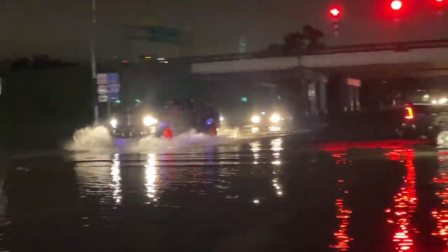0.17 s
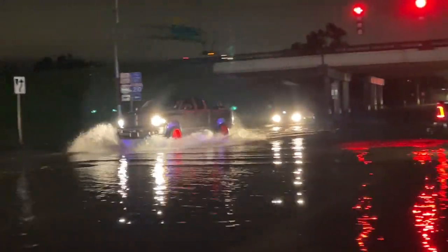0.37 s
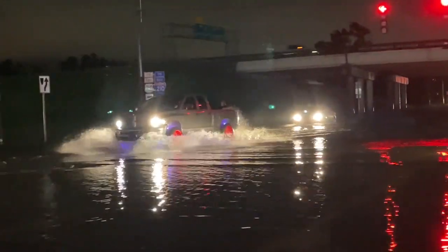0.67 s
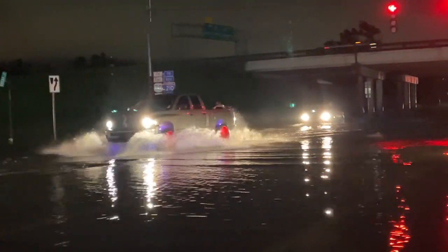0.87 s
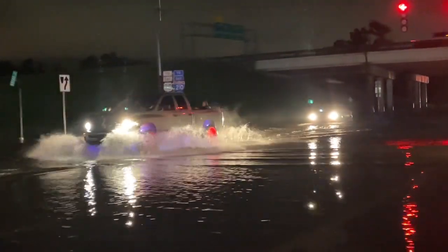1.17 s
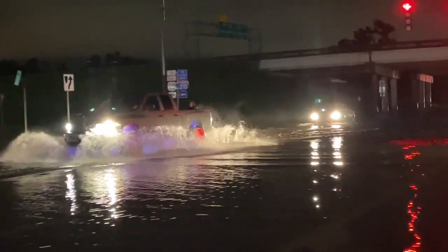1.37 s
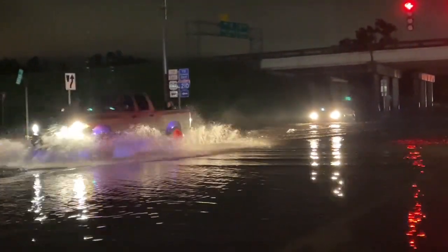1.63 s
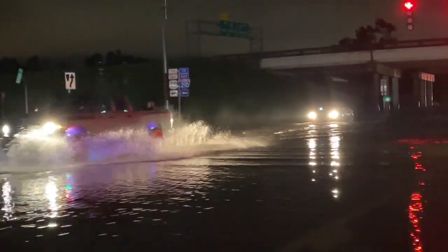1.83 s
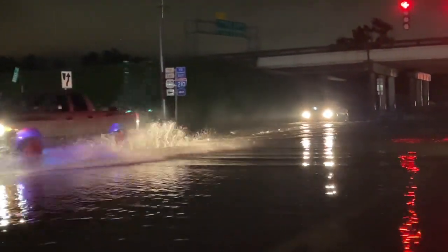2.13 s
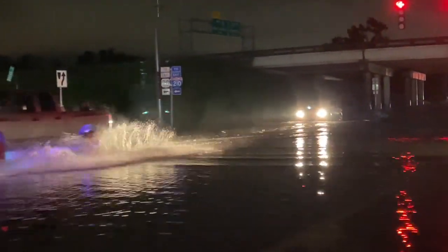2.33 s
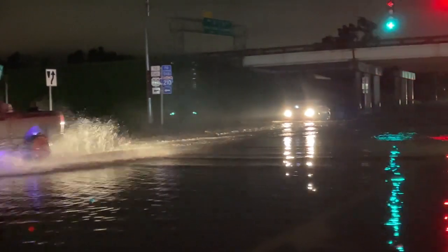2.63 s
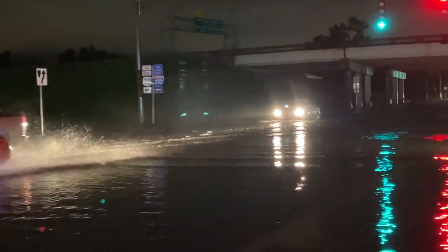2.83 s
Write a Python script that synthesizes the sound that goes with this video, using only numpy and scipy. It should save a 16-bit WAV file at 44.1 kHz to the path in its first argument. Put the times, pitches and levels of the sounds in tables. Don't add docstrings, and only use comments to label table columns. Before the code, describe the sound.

Heavy wet rush of a truck driving through a flooded street, fizzing spray above a rumbling exhaust

```python
import sys
import numpy as np
from scipy import signal
from scipy.io import wavfile
from scipy.ndimage import uniform_filter1d

SR = 44100
rng = np.random.default_rng(int(sys.argv[2]) if len(sys.argv) > 2 else 0)


def voltage_ratio(decibels):
    exponent = np.asarray(decibels, float) / 20
    return 10 ** exponent


def store_wav(level_fs):
    pcm = np.round(np.clip(np.atleast_2d(level_fs), -1, 1) * 32767)
    wavfile.write(sys.argv[1], SR, pcm.T.astype(np.int16))


N = 132300

# time in seconds, level in dB.
SPRAY_NEARNESS = [
    (0.0, -38),
    (0.27, -39.5),
    (1.0, -37.5),
    (1.29, -37.5),
    (1.95, -35.5),
    (3.0, -33.5),
]
# frequency in Hz, share of the dB.
NEARNESS_SHARE = [(200, -.1), (600, .05), (1400, .4), (3000, .85), (8350, 1.25), (8900, -1.6), (9560, -1.4),
                  (9700, 1.1)]
# time in seconds, level in dB.
BOW_SURGES = [(0, -1.5), (.22, 1.7), (.5, 1), (.72, 2), (1.05, 1.5), (1.4, 1), (1.7, 0), (1.9, 1),
              (2.201, 1), (2.47, 0.5), (3, -0.5)]
# frequency in Hz, share of the dB.
SURGE_SHARE = [(150, .05), (350, 0.36), (700, 1), (1800, 1), (4000, 0.35), (8000, 0.15)]
# frequency in Hz, dB per Hz.
CHURN_COLOUR = [(22, -14), (45, -10.5), (70, -3.5), (110, -2), (150, -4), (200, -9.5), (300, -11.5),
                (420, -8)]
RUSH_COLOUR = [(420, 0), (573, -4), (1020, -2.5), (1420, -5.5), (2140, -11), (5400, -17.5), (7000, -24.5),
               (8330, -33.5)]
FIZZ_COLOUR = [(8900, -18), (9250, -12), (9580, -10), (9680, -6), (12100, -0.5), (13500, 1), (15000, -3),
               (15830, -8)]
# frequency in Hz, dB per Hz.
WIDE_LOW_COLOUR = [(22, -16), (60, -6), (110, -2), (170, -1.5), (296, -4.5), (689, 0.5), (1200, -7),
                   (1800, -35)]
WIDE_HIGH_COLOUR = [(2400, -16), (3220, -4.5), (5260, -6.5), (5760, 2.5), (6720, -6), (10000, 0),
                    (12200, -5.5), (12760, -7)]
# frequency in Hz, in-phase part -1..1, quadrature part -1..1.
PORT_LIKENESS = [(100, -0.53, .3), (270, 0.13, 0.4), (450, 0.0056, 0.3), (740, .6, 0.37),
                 (1300, 0.52, 0.081), (2500, -0.037, .5), (5500, .01, 0.69), (10000, -0.0063, .75)]
# frequency in Hz, added likeness per dB of nearness.
LEFTWARD_PULL = [(100, 0.14), (500, 0.08), (1500, 0.1), (3000, .005)]
# frequency in Hz, patch depth in dB, extra nearness share.
WIDTH_SHIFT = [(1000, -0.5, 0.8), (1600, 11.5, -1.5), (3000, 4.5, -0.8), (4500, 6, 0), (5600, -0.3, -.2),
               (8250, 1, 1.1), (8900, .2, 1.5), (10000, 0.5, -0.3)]
# time in seconds, firing rate in Hz, level in dB.
PICKUP_REVS = [
    (0, 105.5, -30.5),
    (.3, 107.1, -27.5),
    (.6, 109.6, -27.5),
    (1.2, 112.7, -25.5),
    (1.5, 114.2, -24.5),
    (1.85, 115.9, -24),
    (2.1, 113.8, -28),
    (2.4, 110.5, -31.5),
    (3, 106, -32),
]
CYCLE_MULTIPLES = [3, 5, 6, 7, 8, 9, 10, 11, 13, 14, 16, 17, 19, 21, 23]
# level in dB at mid pass, change in dB per second as the tailpipe turns.
EXHAUST_TONES = [(-31, 23), (-14, 6), (-15, -1), (-18.5, -7.5), (0, 0.5), (-14.5, -4.5), (-17, -10),
                 (-19, -8.5), (-25, -6), (-19, -5.5), (-17, 3), (-17, 3.5), (-18.5, -3.5), (-18, -0.5),
                 (-26.5, -5.5)]
# time in seconds, hum in Hz, level in dB.
FOLLOWER_HUM = [
    (0, 97.5, -42),
    (.6, 97.5, -39),
    (.9, 97.5, -33),
    (1.2, 97, -35),
    (1.5, 97.6, -33),
    (2.1, 98.8, -31),
    (3, 98, -33.5),
]

PATCH_DB, FLICKER_DB, SWELL_DB, SWELL_HZ = 0.57, 0.54, 0.3, 4.95
DROPS_PER_S, DROPS_DB, DROP_SPREAD_DB = 1900, -47, 3.5
CYLINDERS, MID_PASS_S = 8, 1.64
WOBBLE_HZ, EXHAUST_WOBBLE_DB, PHASE_WANDER_RAD = 5, 2.5, 0.3
ENGINE_PAN_DB, ENGINE_LAG_RAD = -0.8, 0.19
STFT = dict(nperseg=1024, noverlap=768)


def evened(x):
    return x / np.sqrt(np.mean(abs(x) ** 2) + 1e-20)


def read(points, hz, col=1):
    p = np.array(points)
    return np.interp(np.log(hz + 1), np.log(p[:, 0] + 1), p[:, col])


def band(points, level_db, hz):
    inside = (hz >= points[0][0]) * (hz <= points[-1][0])
    g = voltage_ratio(read(points, hz)) * inside
    return voltage_ratio(level_db) * g / np.linalg.norm(g)


def drift(top_hz, t):
    f = np.geomspace(top_hz / 20, top_hz, 24)[:, None]
    sines = np.sin(2 * np.pi * (f * t + rng.random((24, 1))))
    return evened((sines / f ** 0.19).sum(0))


def centred_db(points, t):
    s, db = np.transpose(points)
    return np.interp(t, s, db - db.mean())


def patches(frames, bins_wide, frames_long):
    noise = rng.standard_normal((513, frames))
    across = uniform_filter1d(noise, size=bins_wide, axis=0)
    return evened(uniform_filter1d(across, size=frames_long, axis=1))


def water():
    frames, hz = N // 256 + 5, np.fft.rfftfreq(1024, 1 / SR)
    t = np.arange(frames) * 256 / SR
    near_db = centred_db(SPRAY_NEARNESS, t)
    a, b, c, d = rng.standard_normal((4, 513, frames))
    life_db = read(NEARNESS_SHARE, hz)[:, None] * near_db
    life_db += read(SURGE_SHARE, hz)[:, None] * centred_db(BOW_SURGES, t)
    life_db += PATCH_DB * patches(frames, 10, 12)
    life_db += FLICKER_DB * patches(frames, 90, 3)
    life_db += SWELL_DB * drift(SWELL_HZ, t)

    link = (read(PORT_LIKENESS, hz) + 1j * read(PORT_LIKENESS, hz, col=2))[:, None]
    link = link + read(LEFTWARD_PULL, hz)[:, None] * near_db
    link = link / np.maximum(abs(link), 1)
    shift_db = read(WIDTH_SHIFT, hz)[:, None] * patches(frames, 30, 9)
    shift_db += read(WIDTH_SHIFT, hz, col=2)[:, None] * near_db
    both = a + 1j * b
    apart = link * both + np.sqrt(abs(1 - abs(link) ** 2)) * (c + 1j * d)

    mid = band(CHURN_COLOUR, -30, hz) + band(RUSH_COLOUR, -30, hz) + band(FIZZ_COLOUR, -45.5, hz)
    side = band(WIDE_LOW_COLOUR, -39, hz) + band(WIDE_HIGH_COLOUR, -44.5, hz)
    unit = np.std(signal.istft(both / np.sqrt(513), **STFT)[1])
    spectra = np.array([mid[:, None] * both, side[:, None] * apart * voltage_ratio(shift_db)]) * voltage_ratio(life_db)
    m, s = signal.istft(spectra, **STFT)[1][:, :N] / unit
    return np.array([m + s, m - s])


def drops():
    t, out = np.arange(N) / SR, np.zeros(N)
    hit = rng.random(N) < DROPS_PER_S / SR
    spread_db = DROP_SPREAD_DB * np.minimum(rng.exponential(1, N), 5)
    size = hit * voltage_ratio(spread_db + centred_db(SPRAY_NEARNESS, t))
    kind = rng.integers(0, 20, N)
    for k, hz in enumerate(np.geomspace(700, 5500, 20)):
        u = np.arange(int(8 * SR / hz)) * hz / SR
        plip = u * np.exp(-u / 1.8) * np.sin(2 * np.pi * u * (1 + 0.026 * u))
        out += signal.oaconvolve(size * (kind == k), plip)[:N]
    return voltage_ratio(DROPS_DB) * evened(out) * np.ones((2, 1))


def wobble(t):
    return np.interp(t, t[::200], drift(WOBBLE_HZ, t[::200]))


def pair(tone):
    half = voltage_ratio(ENGINE_PAN_DB / 2) * np.exp(.5j * ENGINE_LAG_RAD)
    return np.sqrt(2) * np.array([(tone * half).real, (tone / half).real])


def pickup():
    t, (s, hz, db) = np.arange(N) / SR, np.transpose(PICKUP_REVS)
    cycle = 2 * np.pi * np.cumsum(np.interp(t, s, hz)) / SR / CYLINDERS
    out = np.zeros(N, complex)
    for k, (order_db, turn_db) in zip(CYCLE_MULTIPLES, EXHAUST_TONES):
        firing = k == CYLINDERS
        shake_db = EXHAUST_WOBBLE_DB * wobble(t) * (0.4 if firing else 1)
        slip = PHASE_WANDER_RAD * wobble(t) * (0.2 if firing else 1)
        slip = slip + 2 * np.pi * rng.random()
        level_db = order_db + turn_db * (t - MID_PASS_S) + shake_db
        out += voltage_ratio(level_db) * np.exp(1j * (k * cycle + slip))
    return pair(out * voltage_ratio(np.interp(t, s, db)))


def follower():
    t, (s, hz, db) = np.arange(N) / SR, np.transpose(FOLLOWER_HUM)
    level_db = np.interp(t, s, db) + 0.5 * wobble(t)
    phase = 2 * np.pi * np.cumsum(np.interp(t, s, hz)) / SR
    return pair(voltage_ratio(level_db) * np.exp(1j * phase))


def scene():
    return water() + drops() + pickup() + follower()


def band_limit(x):
    return signal.sosfilt(signal.butter(12, 15840, fs=SR, output="sos"), x)


def record(dry):
    bass_cut = signal.butter(8, 39, "high", fs=SR, output="sos")
    led_in = np.hstack([dry[:, SR // 2::-1], dry])
    finished = signal.sosfilt(bass_cut, led_in)[:, -N:]
    return band_limit(finished)


dry = scene()
out = record(dry)
store_wav(out)
```